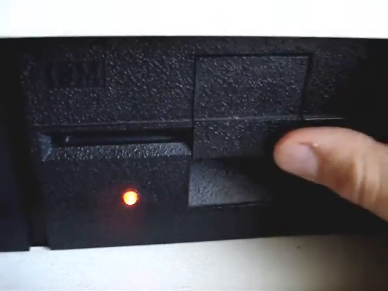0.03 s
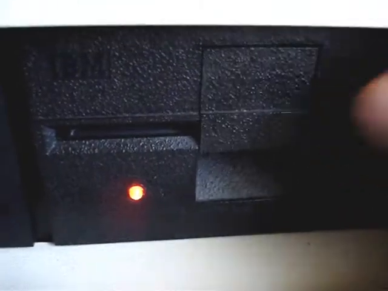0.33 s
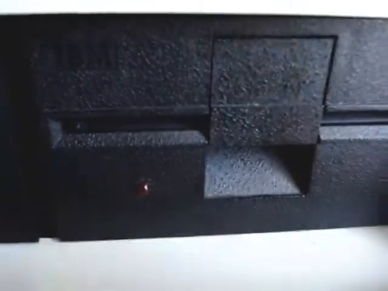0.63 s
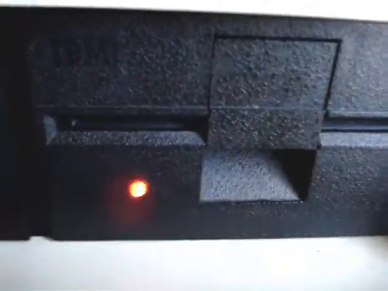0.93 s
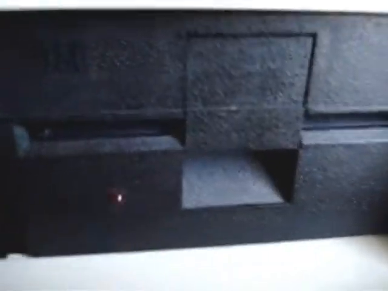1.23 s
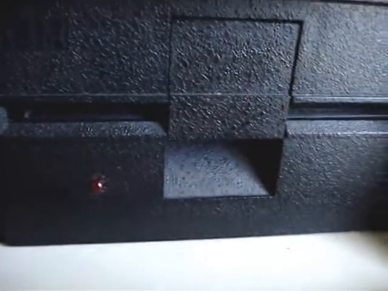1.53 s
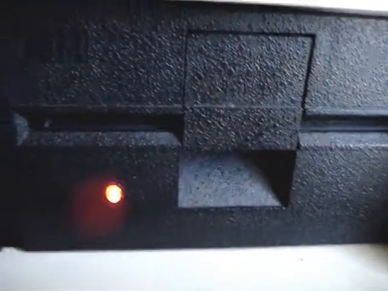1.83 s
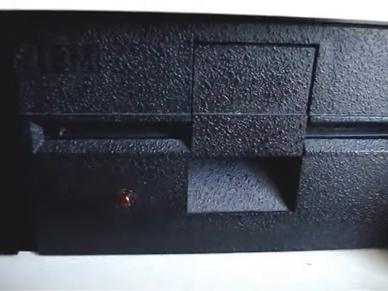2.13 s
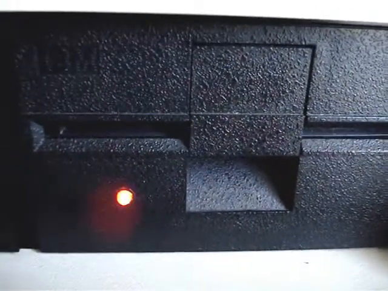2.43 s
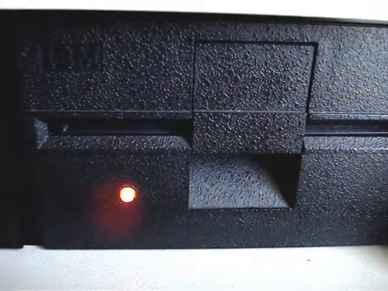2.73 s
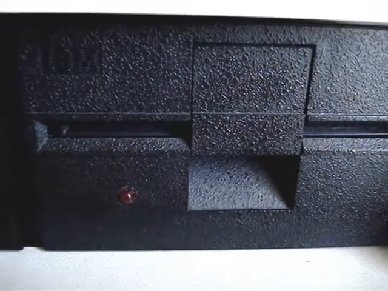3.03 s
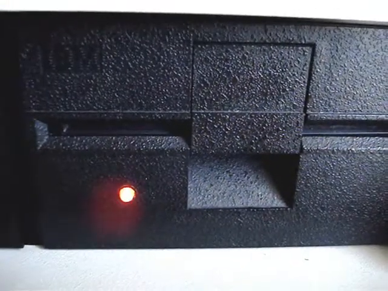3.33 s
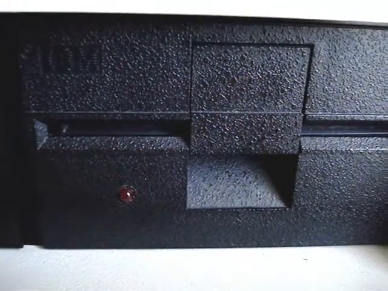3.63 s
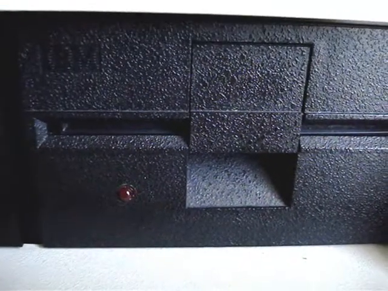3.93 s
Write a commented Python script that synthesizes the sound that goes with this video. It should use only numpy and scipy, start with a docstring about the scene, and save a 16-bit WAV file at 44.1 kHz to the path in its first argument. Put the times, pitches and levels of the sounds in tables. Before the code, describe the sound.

A disk drive latch is flipped shut close to the microphone, clicking quickly and snapping home with a sharp plastic clack. A few light ticks follow, while a computer's fan and motors hum steadily in a small room.

```python
"""A computer's fan and motors hum throughout. At once a thumb flips the latch of a disk drive shut,
close by: it clicks over its catches, each impact exciting the modes of plastic, flap and metal.
At 0.13 s it snaps home with a clack that rings the spring and thumps the case, and a small room
reverberates. A few light ticks follow as the mechanism settles, up to about 1 s.
From about 3 s the spinning drive whistles faintly."""
import sys
import numpy as np
from scipy import signal
from scipy.fft import rfft, irfft
from scipy.io import wavfile
from scipy.ndimage import uniform_filter1d

SR = 44100
rng = np.random.default_rng(int(sys.argv[2]) if len(sys.argv) > 2 else 0)


def dump(signal):
    """Clip the signal to [-1, 1] and save it as 16-bit WAV at the path in sys.argv[1]."""
    limited = np.clip(np.atleast_2d(signal).T, -1, 1)
    pcm = np.round(limited * 32767).astype(np.int16)
    wavfile.write(sys.argv[1], SR, pcm)


N = 176400


def amp(db):
    """Amplitude ratio of a level in decibels."""
    return 10 ** (np.asarray(db) / 20)

def unit(x):
    """Normalisation to rms 1."""
    return x / np.sqrt(np.mean(x ** 2) + 1e-20)

def curve_at(points, hz):
    """Interpolation on a log-frequency axis."""
    f, value = np.transpose(points)
    return np.interp(np.log(hz + 1), np.log(f + 1), value)

def add(mix, start_s, sound):
    """Superposition of a delayed sound on the mix."""
    part = mix[max(round(start_s * SR), 0):][:len(sound)]
    part += sound[:len(part)]

def colour(x, gain):
    """Zero-phase filtering by a gain that depends on frequency."""
    return irfft(rfft(x) * gain(np.fft.rfftfreq(len(x), 1 / SR)), len(x))

def drift(hz):
    """Random modulation: low-passed noise of rms 1."""
    return unit(colour(rng.standard_normal(N), lambda f: np.exp(-(f / hz) ** 2) * (f > 0)))

def damp_bands(x, t60_curve):
    """Frequency-dependent damping: each band falls 60 dB in its own decay time."""
    hz, t, spectrum = signal.stft(x, SR, nperseg=128)
    decay = amp(-60 * t / curve_at(t60_curve, hz)[:, None])
    return signal.istft(spectrum * decay, SR, nperseg=128)[1][:len(x)]

def mode(t, hz, t60, phase_cycles=0):
    """Free vibration of a damped oscillator."""
    return np.exp(-np.log(1000) * t / t60) * np.sin(2 * np.pi * (hz * t + phase_cycles))

def tone(hz, wander_hz):
    """Random frequency modulation of a sinusoid of rms 1."""
    return np.sqrt(2) * np.sin(2 * np.pi * np.cumsum(hz + wander_hz * drift(15.1)) / SR)

# Spectral density of the fan's air: frequency_hz, relative_db
AIR_SPECTRUM = [(20, -25), (60, -13), (85, -15), (130, -6), (200, -3.5), (310, 0.5), (440, -3), (600, -2.5),
                (880, -4), (1020, -7), (1500, -9.5), (1900, -11.5), (2300, -13), (3000, -15), (3600, -17.5),
                (5500, -21), (8500, -25.5), (9700, -29.5), (10400, -34.5), (11400, -33), (12100, -38.5),
                (13000, -32.5), (15500, -32.5)]
# Slow change of its level: time_s, gain_db
AIR_LEVEL = [(0, 2), (.7, 1.2), (1.3, 0.8), (1.9, -0.2), (2.2, 0.5), (2.5, -0.3), (3.1, 0.2), (4, 0)]
# Soft swells in single bands: peak_s, length_s, centre_hz, width_hz, level_db
AIR_SWELLS = [(1.2, 0.75, 1330, 270, -55.5), (2.166, 0.11, 400, 500, -49), (3.053, 0.076, 770, 450, -46.5),
              (3.055, 0.041, 5940, 7000, -58), (.55, 0.23, 156, 29.8, -50.5), (2.09, 0.06, 161, 50, -52.5)]

def fan():
    """Broadband flow noise: rushing air with drifting spectral patches and soft swells."""
    air_db, patch_db = -46, 0.67
    t = np.arange(N) / SR
    hz, _, spectrum = signal.stft(rng.standard_normal(N), SR, nperseg=2048, noverlap=1536)
    patches = uniform_filter1d(rng.standard_normal(spectrum.shape), size=16, axis=0)
    patches = unit(uniform_filter1d(patches, size=9, axis=1))
    spectrum *= amp(curve_at(AIR_SPECTRUM, hz)[:, None] + patch_db * patches)
    air = unit(signal.istft(spectrum, SR, nperseg=2048, noverlap=1536)[1][:N])
    air *= amp(air_db + np.interp(t, *np.transpose(AIR_LEVEL)))
    for peak_s, length_s, centre_hz, width_hz, level_db in AIR_SWELLS:
        passband = lambda f: (1 + (2 * (f - centre_hz) / width_hz) ** 4) ** -.5 * f / (f + 200)
        band = unit(colour(rng.standard_normal(N), passband))
        air += amp(level_db) * band * np.exp(-2 * ((t - peak_s) / length_s) ** 2)
    return air

# Steady motor and fan tones: pitch_hz, rms_db
HUM_TONES = [(96.9, -58), (120.5, -64.5), (291, -64), (409, -62.5), (561.5, -52), (881, -59.5),
             (1125, -66.5), (1852, -66), (1890, -68.5), (2116, -71), (2562, -70), (2885, -67),
             (3122, -69.5), (3946, -77), (4603, -77)]
# Passing whines: start_s, end_s, pitch_hz, rms_db, wander_hz, roughness (0-1)
WHINES = [(-.2, 1.25, 166.5, -56.5, 4, .4), (.22, .95, 2702, -63, 2, .1), (1.45, 2.25, 2702, -62.5, 3, .1),
          (2.6, 2.95, 2702, -61.5, 3, .1), (2.85, 4.2, 2702, -71, 3, .1), (.8, 1.7, 1335, -58.5, 22, .5),
          (2.05, 2.5, 1860, -63, 6, .3), (3.05, 3.76, 8640, -72, 35, .5), (3.6, 4.15, 8640, -78, 45, .7),
          (2.95, 4.2, 6934, -74, 12, .45)]

def motors():
    """Tonal noise of rotating machinery: a steady hum, and fluttering whines that come and go."""
    waver_hz, flutter_hz, fade_s = 1.32, 70, 0.11  # waver is that of a 500 Hz tone
    t = np.arange(N) / SR
    out = sum(amp(db) * tone(hz, waver_hz * np.sqrt(hz / 500)) for hz, db in HUM_TONES)
    for start_s, end_s, pitch_hz, rms_db, wander_hz, roughness in WHINES:
        flutter = np.sqrt(1 - roughness ** 2) + roughness * drift(flutter_hz)
        fade = np.clip(np.minimum(t - start_s, end_s - t) / fade_s, 0, 1)
        out += amp(rms_db) * flutter * tone(pitch_hz, wander_hz) * fade
    return out

# Reverberation time of the small room: frequency_hz, t60_s
ROOM_DECAY = [(150, 1), (1000, 0.57), (4000, 0.079), (9000, 0.23), (15000, 0.48)]

def room(x):
    """Reverberation: sparse reflections, absorbed at a different rate in each band."""
    reflections_per_s, gap_s, reverb_db = 4000, .005, -15
    size = SR // 2
    reflections = rng.standard_normal(size) * (rng.random(size) < reflections_per_s / SR)
    reflections *= np.arange(size) > gap_s * SR
    tail = damp_bands(reflections, ROOM_DECAY)
    return amp(reverb_db) * signal.fftconvolve(x, tail / np.linalg.norm(tail))[:N]

def housing():
    """Resonance: the housing answers a jolt with one low mode that builds up slowly."""
    t = np.arange(SR // 2) / SR
    rise_s = .03
    return (1 - np.exp(-t / rise_s)) * mode(t, hz=293, t60=.19)

def thump():
    """Air displacement: the closing flap pushes out a compression, then a shallow rarefaction."""
    start_s, pulse_s = .128, 0.0036
    age = np.maximum(np.arange(N) / SR - start_s, 0) / pulse_s
    return amp(-16) * age * (np.exp(-age) - np.exp(-age / 3) / 9)

def click():
    """Contact transient: one sharp swing of pressure under a Gaussian envelope."""
    pitch_hz, width_s = 3840, 0.000144
    t = np.arange(SR // 500) / SR - 2 * width_s
    return amp(10) * np.exp(-(t / width_s) ** 2) * np.sin(2 * np.pi * pitch_hz * t)

# Spectral density of the struck plastic front: frequency_hz, relative_db
PLASTIC_SPECTRUM = [(100, -16), (300, -13), (480, -8), (780, 3.5), (980, -6), (1300, 2), (1650, -1.5),
                    (2250, -5.5), (2650, -5), (3100, -4.5), (3500, -4.5), (5000, -6), (5500, -5.5),
                    (8500, -12), (11500, -23), (15500, -20.5)]
# Its decay before decay_factor is applied: frequency_hz, t60_s
PLASTIC_DECAY = [(150, 0.23), (800, 0.16), (2000, 0.24), (5000, 0.071), (15000, 0.088)]

def plastic(tilt_db, decay_factor, spot_hz, spot_db):
    """Modal overlap: crowded, damped modes merge into noise; the struck spot favours one octave."""
    split_hz, low_rise_s, high_rise_s = 730, 0.00083, 0.00025
    t = np.arange(SR // 4) / SR

    def gain(f):
        slope_db = tilt_db * np.log2(np.clip(f, 300, 7000))
        lift_db = spot_db * np.exp(-2 * np.log2((f + 1) / spot_hz) ** 2)
        return amp(curve_at(PLASTIC_SPECTRUM, f) + slope_db + lift_db)

    noise = unit(colour(rng.standard_normal(len(t)), gain))
    ring = damp_bands(noise, [(hz, t60 * decay_factor) for hz, t60 in PLASTIC_DECAY])
    low = colour(ring, lambda f: np.exp(-(f / split_hz) ** 2))
    return low * (1 - np.exp(-t / low_rise_s)) + (ring - low) * (1 - np.exp(-t / high_rise_s))

# Modes of latch, spring and frame: pitch_hz, relative_db, t60_s
METAL_MODES = [(563, -21.5, .2), (861, -21.5, .15), (1340, -30, .2), (1507, -28, .18), (1647, -27, .2),
               (1915, -21, .14), (2019, -12.5, .15), (2089, -27, .15), (2560, -19, .085), (3429, -24, .05),
               (4350, -27, .07), (4925, -20, .045), (5050, -22, .05), (10090, -39, .12), (14110, -40, .1)]

def metal():
    """Contact damping: the metal modes ring freely until the flap seats and mutes them."""
    ramp_s, seat_s, mute_db = .004, 0.017, -15.5
    t = np.arange(SR // 3) / SR
    ring = sum(amp(db) * mode(t, hz, t60, rng.random()) for hz, db, t60 in METAL_MODES)
    seated = .5 + .5 * np.tanh((t - seat_s) / ramp_s)
    return ring * (1 - np.exp(-t / ramp_s)) * amp(mute_db * seated)

# Modes of the latch flap: pitch_hz, relative_db, t60_s
FLAP_MODES = [(730, -5, .09), (861, -8, .075), (1235, -7, .06), (1324, -6, .05), (1545, -7, .07),
              (2080, -7, .06), (3380, -7, .05), (3730, -8, .05), (4250, -8, .05), (4410, -7, .055),
              (5750, -12, .04)]

def flap(spot_hz):
    """Selective excitation: modes near the octave that the struck spot favours ring most."""
    falloff_db_per_octave = 5.5
    t = np.arange(SR // 8) / SR
    ring = np.zeros(len(t))
    for hz, db, t60 in FLAP_MODES:
        coupling_db = -falloff_db_per_octave * abs(np.log2(hz / spot_hz))
        ring += amp(db + coupling_db) * mode(t, hz, t60) * rng.choice([-1, 1])
    return ring

# Contacts of the latch: start_s, level_db, tilt_db (per octave), metal_db, flap_db, click_db, decay_factor,
# spot_hz, spot_db; the flap and click columns are gains on top of level_db, the metal column a gain on top of
# level_db less the level of the hardest contact
CONTACTS = [(0.0106, -27, 2, -32, -2, -22, 0.51, 3830, 3.5), (0.0128, -32, 11, -30, 3.5, 4, 0.19, 4200, 14),
            (.035, -36.5, -1, -11, 6, -21, 0.42, 1240, 13),
            (0.0543, -22.5, 2.5, -28, 3, -20, 0.69, 1100, 8),
            (0.0624, -30, -1.5, -20, 0.5, -8, 0.57, 1100, -7),
            (0.084, -31.5, -0.5, -25, -16, -18, 0.62, 800, 4), (0.111, -29, 5, -34, -5, -20, 0.66, 3900, 1),
            (0.1283, -24.5, 4.5, 0, 2, 10.5, 1.2, 4700, -0.5),
            (0.1414, -24, -5.5, -9, -4.5, -10, 0.46, 1100, -0.5),
            (.162, -33, 16, -12, -4, -4, 0.8, 4400, 9), (0.171, -30.5, 0, -16, -6, -16, 0.92, 1820, 4),
            (0.181, -39.5, 2, -24, -8, -8, 1.8, 6860, 15), (.196, -36.5, 0, -14, -13, -14, 1.3, 1500, -1),
            (.2415, -44.5, 4, -20, -8, -8, .6, 5040, 2), (0.5389, -34, -2.5, -19, -4, -14, 0.44, 2400, -2)]
# Jolts to the housing: start_s, level_db
JOLTS = [(.0545, -27), (.143, -25)]
# Ticks of the settling mechanism: start_s, level_db, tilt_db (per octave), spot_hz, spot_db
TICKS = [(0.7485, -56, 4, 4960, 4), (1.013, -48, 7, 4600, 12), (1.024, -45, -4, 4600, 8)]

def latch():
    """Impact excitation: contacts ring plastic, metal and flap; jolts, the housing; ticks, plastic."""
    out = np.zeros(N)
    hardest_db = max(row[1] for row in CONTACTS)
    for start_s, db, tilt_db, metal_db, flap_db, click_db, decay_factor, spot_hz, spot_db in CONTACTS:
        add(out, start_s, amp(db) * plastic(tilt_db, decay_factor, spot_hz, spot_db))
        add(out, start_s, amp(db - hardest_db + metal_db) * metal())
        add(out, start_s, amp(db + click_db) * click())
        add(out, start_s, amp(db + flap_db) * flap(spot_hz))
    for start_s, db in JOLTS:
        add(out, start_s, amp(db) * housing())
    for start_s, db, tilt_db, spot_hz, spot_db in TICKS:
        add(out, start_s, amp(db) * plastic(tilt_db, 0.66, spot_hz, spot_db))
    return out

def scene():
    """Superposition in mono: the latch, its reverberation and its thump over the running machine."""
    clacks = latch()
    return (clacks + room(clacks) + thump() + fan() + motors())[None]

def record(dry):
    """Band limiting by a steep linear-phase low-pass filter."""
    cutoff_hz = 15800
    lowpass = signal.firwin(511, cutoff_hz, window=("kaiser", 9), fs=SR)
    return signal.oaconvolve(dry, lowpass[None], "same")

dry = scene()
out = record(dry)
dump(out)
```